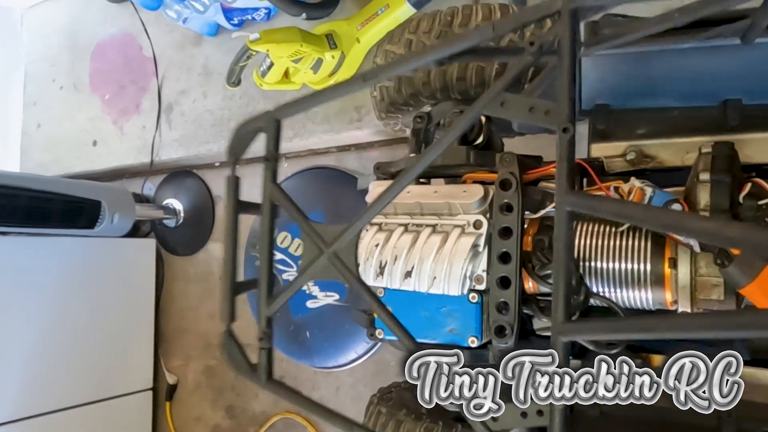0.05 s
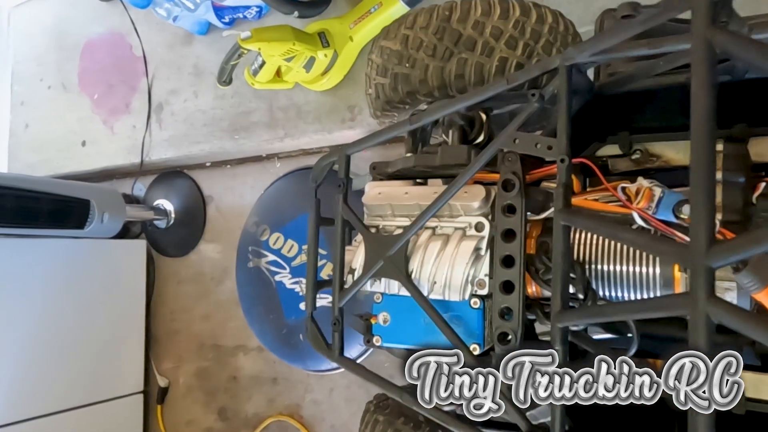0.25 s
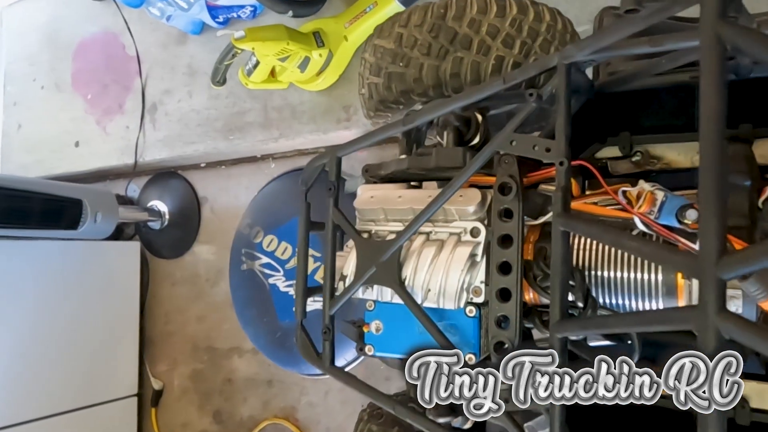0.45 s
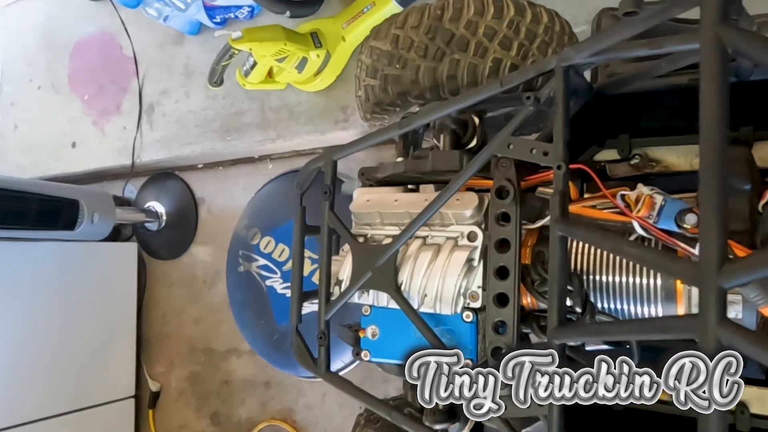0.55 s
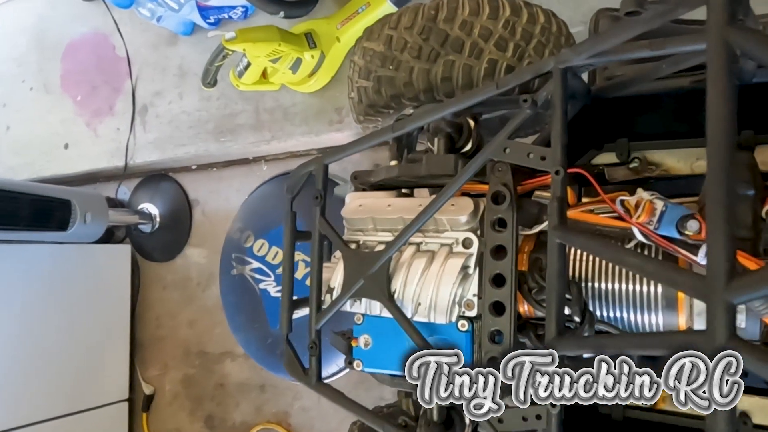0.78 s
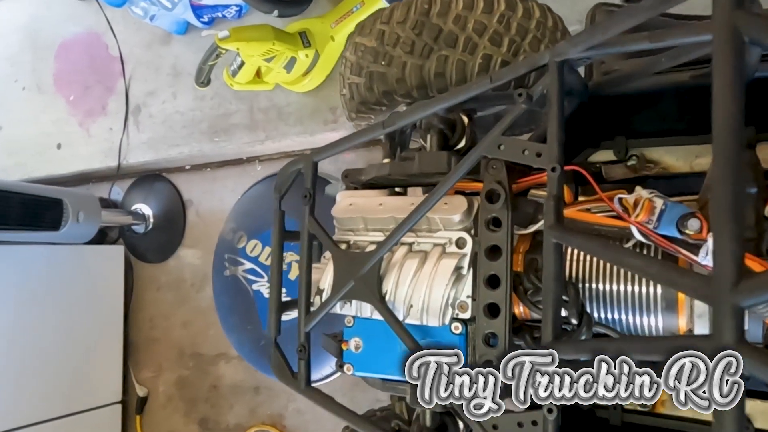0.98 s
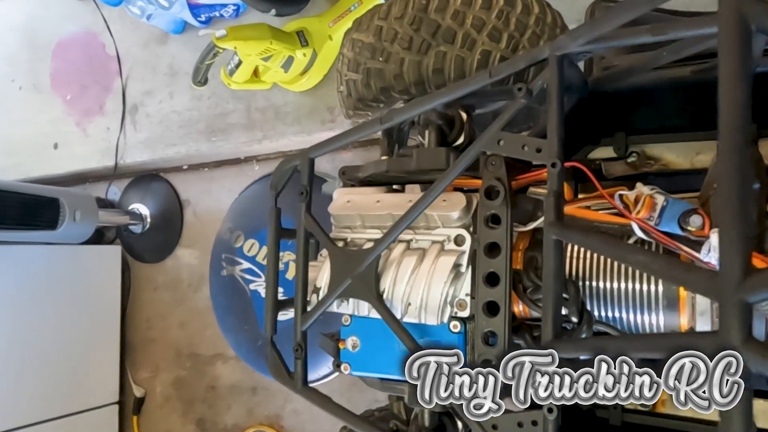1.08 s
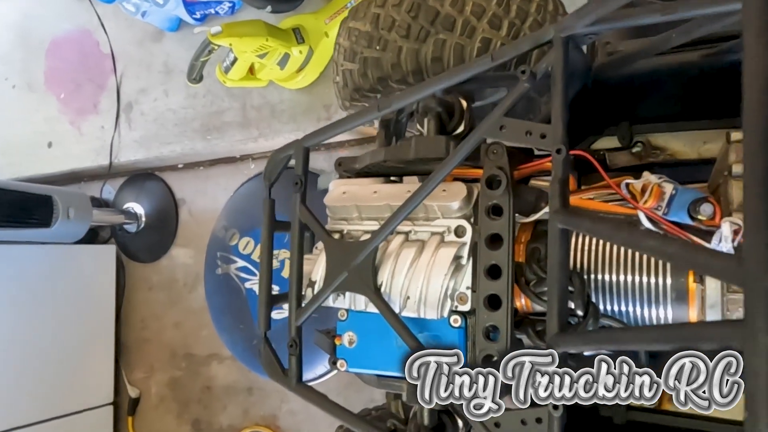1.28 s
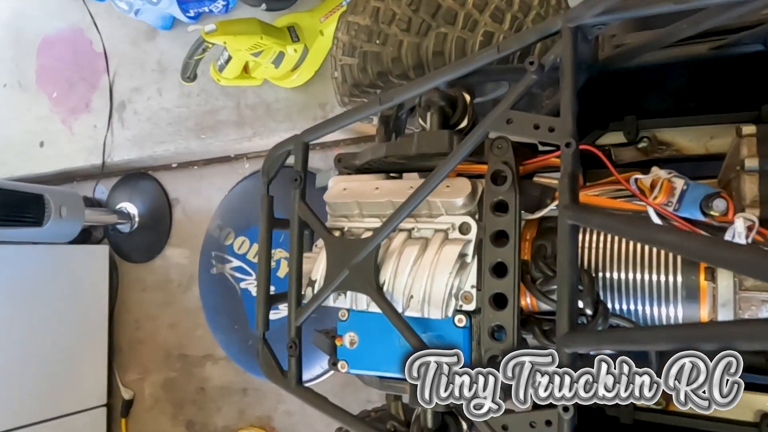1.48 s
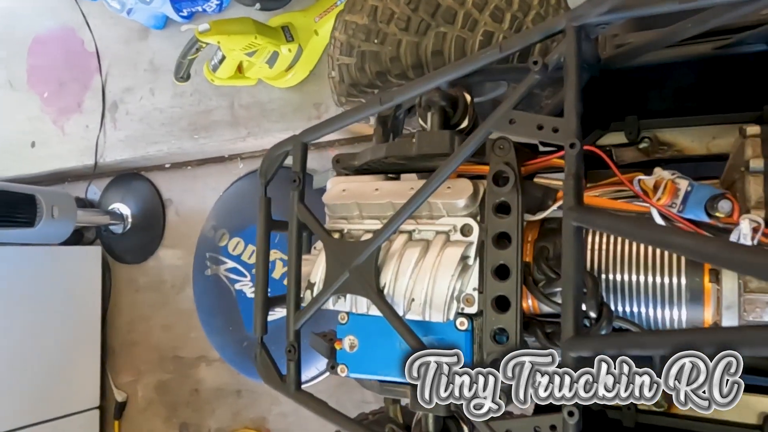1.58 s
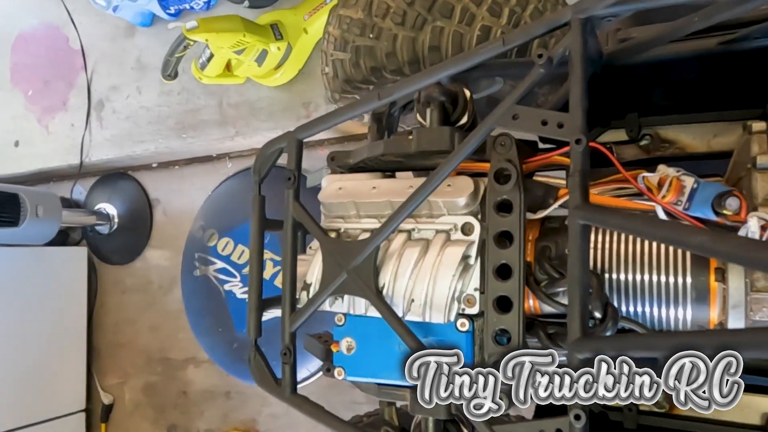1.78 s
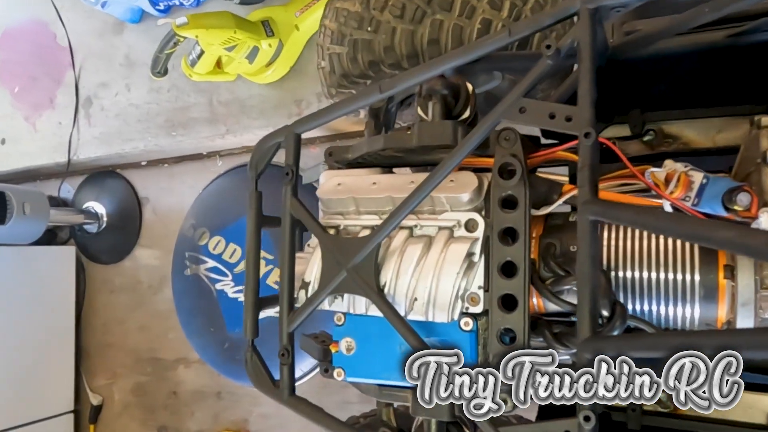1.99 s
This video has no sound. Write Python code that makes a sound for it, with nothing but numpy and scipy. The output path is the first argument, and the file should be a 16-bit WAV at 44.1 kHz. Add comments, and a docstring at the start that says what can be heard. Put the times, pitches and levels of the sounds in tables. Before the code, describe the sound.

A metal tube cage snaps shut on steel sliders, very close: a faint rustle at 0.1 s, a light touch, then a loud overloaded clack at 0.2 s with tiny rapid bounces, brief metallic ringing and a short room tail. Quiet fan hum and low rumble continue. Around 1.2 to 1.3 s come small clicks with a soft low thump, and a barely audible tick at 1.85 s. Nearly mono.

```python
"""In a quiet workshop, a tube cage snaps shut on steel sliders close to a phone microphone.
A light touch leads to a loud clipped blow with bounces: damped sines ring the tubes, shaped noise makes
the crack and the short room tail. Later come small ticks (noise clicks with sine rings) and soft low
knocks (damped bass sines). Behind it all a fan hums, from filtered noise and wavering tones, over a
wandering rumble; a faint high rustle comes before the snap. Nearly mono: a very faint lagged, filtered
copy and shaped noise set the channels slightly apart."""
import sys
import numpy as np
from scipy import signal
from scipy.fft import rfft, irfft
from scipy.io import wavfile
from scipy.ndimage import uniform_filter1d

SR = 44100
rng = np.random.default_rng(int(sys.argv[2]) if len(sys.argv) > 2 else 0)


def to_wav(sig):
    """Store sig (one row per channel, or 1-D mono) as 16-bit WAV at the path in sys.argv[1].

    Samples outside -1..1 are clipped; the rate is SR.
    """
    pcm = np.clip(np.atleast_2d(sig), -1, 1) * 32767
    pcm = np.round(pcm).astype(np.int16)
    wavfile.write(sys.argv[1], SR, pcm.T)  # frames by channels


N = 90404
T = np.arange(N) / SR  # s
F = np.maximum(np.arange(N // 2 + 1) * SR / N, 1)  # Hz, kept off zero for the logarithms

# Contacts of cage and slider: start_s, relative level_db, contact_ms, dullness_db_per_octave
CONTACTS = [(.195, -17, 0.12, 2.5), (0.203, -9.5, 0.29, 0.5), (0.2057, 2.5, 0.22, -1),
            (0.2093, -7.5, 0.24, -5.5), (0.2134, -7.5, .5, 3.5), (0.2222, -15.5, .5, 0.5),
            (.2505, -22.5, 0.46, -3)]
DULLNESS_PIVOT_HZ = 2500  # dullness tilts the spectrum about this pitch


def amp(db):
    """Amplitude ratio of a level in dB."""
    return 10 ** (np.asarray(db) / 20)


def read_log_hz(table, hz):
    """Second column of a table, interpolated on a log-frequency axis."""
    table = np.array(table)
    return np.interp(np.log(hz), np.log(table[:, 0]), table[:, 1])


def envelope_db(points):
    """Level in dB over time, joined by straight lines between the points."""
    return np.interp(T, *np.array(points).T)


def noise(gain):
    """Noise of unit rms, its spectrum shaped by a gain per frequency."""
    shaped = irfft(rfft(rng.standard_normal(N)) * gain, N)
    return shaped / np.sqrt(np.mean(shaped ** 2))


def peak(hz, width_hz):
    """Resonance-shaped gain, down to half at half the width from the centre."""
    return 1 / (1 + ((F - hz) / (width_hz / 2)) ** 2)


def walk(rate_hz):
    """Smooth random wander: held random steps, averaged twice."""
    hold = int(SR / rate_hz)
    steps = np.repeat(rng.standard_normal(N // hold + 1), hold)
    smooth = uniform_filter1d(uniform_filter1d(steps, hold), hold)
    return 1.323 * smooth[:N]  # makes up for the level lost in averaging


def fade(start_s, t60_s, rise_s):
    """Exponential rise from the start, times a decay of 60 dB in t60."""
    t60_s = max(t60_s, .002)
    out = np.zeros(N)
    span = slice(int(start_s * SR) + 1, int((start_s + 2 * t60_s) * SR))
    t = T[span] - start_s
    rise = 1 - np.exp(-t / max(rise_s, 1e-5))
    out[span] = rise * np.exp(-np.log(1000) * t / t60_s)
    return out


def ring(start_s, hz, t60_s, rise_s):
    """Damped mode: a sine that starts at zero phase and dies away."""
    return fade(start_s, t60_s, rise_s) * np.sin(2 * np.pi * hz * (T - start_s))


def tubes():
    """Each contact excites every mode of the cage; a longer contact starts them more slowly."""
    # Tube modes: pitch_hz, relative level_db, t60_s
    modes = [(935, -4, 0.044), (1293, -6, .06), (1430, -12.5, 0.19), (1768, -5, 0.093), (1906, -17, .15),
             (2142, -20, 0.14), (2731, -10.5, 0.09), (2923, 1.5, .06), (3140, -7, 0.12),
             (3520, -15.5, 0.2017), (3615, -9, 0.0599), (4150, -10.5, .05), (5162, -12.5, .1),
             (5766, -10, .04)]
    spread_db = 2.6 * rng.standard_normal((len(CONTACTS), len(modes)))
    out = np.zeros(N)
    for i, (start_s, level_db, contact_ms, dullness) in enumerate(CONTACTS):
        for k, (hz, mode_db, t60_s) in enumerate(modes):
            tilt_db = -dullness * np.log2(hz / DULLNESS_PIVOT_HZ)
            level = amp(level_db + mode_db + tilt_db + spread_db[i, k])
            sign = (-1) ** k  # neighbouring modes start in opposite directions
            out += sign * level * ring(start_s, hz, t60_s, contact_ms / 3000)
    return out


def burst(colour, decays, extra_rise_ms):
    """Half-octave noise bands started by every contact, each dying at its own rate."""
    rattle_db, rattle_hz = 1.5, 500  # loose parts make the decay uneven
    spectrum = rfft(rng.standard_normal(N)) * amp(read_log_hz(colour, F))
    norm = np.std(irfft(spectrum, N))
    out = np.zeros(N)
    for hz in 150 * 2 ** np.arange(0, 7, .5):
        octaves_off = np.clip(np.log2(F / hz), -.5, .5)
        band = irfft(spectrum * np.cos(np.pi * octaves_off) ** 2, N) / norm
        t60_s = read_log_hz(decays, hz)
        power = np.zeros(N)
        for start_s, level_db, contact_ms, dullness in CONTACTS:
            level = amp(level_db - dullness * np.log2(hz / DULLNESS_PIVOT_HZ))
            power += (level * fade(start_s, t60_s, (contact_ms + extra_rise_ms) / 1000)) ** 2
        out += band * np.sqrt(power)
    return out * amp(rattle_db * walk(rattle_hz))


def crack():
    """Broadband noise of the impact, rising within the contact time."""
    # Crack spectrum: frequency_hz, relative level_db per Hz
    crack_colour = [(150, -36.5), (300, -26.5), (500, -19), (900, -4), (1500, -5.5), (2200, -1.5),
                    (3000, -3), (4000, -7), (4700, -19), (5900, -8.5), (7300, -16.5), (8700, -12),
                    (11000, -23.5), (16000, -36.5)]
    # Crack decay: frequency_hz, t60_s
    crack_decay = [(200, 0.066), (1000, .055), (3000, 0.051), (5500, 0.064), (9000, 0.029), (15000, 0.028)]
    return burst(crack_colour, crack_decay, 0)


def room_tail():
    """The room answers each contact with noise that builds more slowly and lasts longer."""
    # Room spectrum: frequency_hz, relative level_db per Hz
    room_colour = [(150, -30), (250, -22), (400, -24), (700, -12), (1400, -4.5), (2000, -7), (3500, -6),
                   (4700, -16), (6000, -12.5), (7600, -18), (10000, -29), (13400, -44), (16000, -54.5)]
    # Room decay: frequency_hz, t60_s
    room_decay = [(200, .3), (1000, 0.27), (3000, 0.31), (7000, .3), (15000, .2)]
    return burst(room_colour, room_decay, 15)


def cage():
    """The contacts ring the tubes, crack, and fill the room."""
    tubes_db, crack_db, room_db = -9.5, -4.5, -18
    return amp(tubes_db) * tubes() + amp(crack_db) * crack() + amp(room_db) * room_tail()


def ticks():
    """Small contacts: a bright noise click, two short rings and a faint noise tail."""
    # Ticks: start_s, click_db, ring_hz, ring_db, second_ring_hz, second_ring_db, ring_t60_s
    tick_rows = [(1.2256, -31.5, 3150, -24.5, 4450, -29.5, .015), (1.298, -60, 6300, -57, 4300, -60, .01),
                 (1.3047, -43, 4100, -23.5, 3800, -25, 0.0077),
                 (1.306, -55, 2730, -38.5, 543, -33.5, 0.033), (1.3082, -53, 4300, -39, 1250, -28, .012),
                 (1.841, -57, 6000, -60, 7900, -60, .01)]
    rise_s, click_t60_s = .0006, .0085
    tail_db, tail_t60_s = -25.5, .15  # tail level is relative to the click
    hiss = noise(peak(6530, 7000) ** 2)
    out = np.zeros(N)
    for start_s, click_db, hz1, db1, hz2, db2, ring_t60_s in tick_rows:
        click = fade(start_s, click_t60_s, rise_s)
        tail = amp(tail_db) * fade(start_s, tail_t60_s, .0001)
        out += amp(click_db) * hiss * (click + tail)
        out += amp(db1) * ring(start_s, hz1, ring_t60_s, rise_s)
        out += amp(db2) * ring(start_s, hz2, ring_t60_s, rise_s)
    return out


def knocks():
    """Soft damped low sines, under the snap and again among the ticks."""
    # Knocks: start_s, level_db, pitch_hz, t60_s, sign of the first swing
    knock_rows = [(0.204, -27, 79.9, 0.089, 1), (0.219, -32, 288, 0.22, 1), (1.2156, -21, 75, .025, 1),
                  (1.2254, -26.5, 110.1, 0.054, 1), (1.228, -34.5, 344, 0.053, -1),
                  (1.2434, -28.5, 44.7, 0.16, 1), (1.264, -37.5, 109, 0.065, 1),
                  (1.308, -41.5, 155, 0.097, 1)]
    out = np.zeros(N)
    for start_s, level_db, hz, t60_s, sign in knock_rows:
        out += np.sign(sign) * amp(level_db) * ring(start_s, hz, t60_s, .002)
    return out


def fan():
    """Slowly wavering air hiss, narrow noise hums and tones that drift in pitch and level."""
    # Air hiss spectrum: frequency_hz, relative level_db per Hz
    air_colour = [(70, -8), (90, -16), (180, -17.5), (240, -11), (340, -16), (420, -9), (560, -11.5),
                  (800, -10), (960, -13), (1200, -11), (2000, -17), (3000, -19), (4200, -24.5),
                  (4900, -35.5), (6200, -32.5), (7500, -38.5), (10000, -42.5), (13000, -42.5), (16000, -44)]
    # Narrow hums: centre_hz, width_hz, level_db rms
    hums = [(475, 50, -60.5), (715, 51, -56.5), (1024, 30, -61)]
    # Fan tones: pitch_hz, level_db rms, waver_hz
    tones = [(291.5, -58.5, 1), (518.4, -57.5, 2.5)]
    low_cut = np.minimum(F / 70, 1) ** 2
    out = amp(-50.5 + .6 * walk(9.5)) * noise(amp(read_log_hz(air_colour, F)) * low_cut)
    for hz, width_hz, level_db in hums:
        out += amp(level_db) * noise(peak(hz, width_hz))
    for hz, level_db, waver_hz in tones:
        level = np.sqrt(2) * amp(level_db + 1.5 * walk(8))
        phase = 2 * np.pi * np.cumsum(hz + waver_hz * walk(9)) / SR
        out += level * np.sin(phase)
    return out


def rumble():
    """Deep noise around 30 Hz whose level wanders."""
    # Rumble level: time_s, level_db
    rumble_level = [(0, -57.5), (.5, -60), (.9, -55), (1.15, -58), (1.28, -48.5), (1.5, -51), (1.7, -56),
                    (2.05, -58)]
    low_cut = np.minimum(F / 8, 1)
    return amp(envelope_db(rumble_level)) * noise(peak(30, 60.27) * low_cut)


def rustle():
    """Faint high noise with a flickering level, strongest before the snap."""
    # Rustle level: time_s, level_db
    rustle_level = [(.07, -90), (.09, -66), (.13, -76), (.15, -96)]
    flicker_db = 2.53 * walk(120)
    return amp(envelope_db(rustle_level) + flicker_db) * noise(peak(6800, 2500))


def channel_offset(mid):
    """A very faint lagged, filtered copy of the middle and shaped noise set the channels slightly apart."""
    # Level of the lagged copy: frequency_hz, gain_db
    copy_gain = [(40, -39), (150, -24), (300, -28), (700, -39), (3000, -42), (6000, -37), (14000, -28)]
    # Shaped noise spectrum: frequency_hz, relative level_db per Hz
    noise_colour = [(35, -23), (60, -1), (244, -7), (301, -30.5), (4020, -22.5), (5990, -2.5), (16000, -7)]
    lag_s = .7 / 1000
    lag = np.exp(-2j * np.pi * F * lag_s)
    late = irfft(rfft(mid) * amp(read_log_hz(copy_gain, F)) * lag, N)
    return late + amp(-80) * noise(amp(read_log_hz(noise_colour, F)))


def scene():
    """Sum all sources in the middle, then add and subtract the offset for two nearly equal channels."""
    mid = cage() + ticks() + knocks() + fan() + rumble() + rustle()
    offset = channel_offset(mid)
    return np.array([mid + offset, mid - offset])


def record(dry):
    """The loud blow is clipped hard at full scale; a steep low-pass then cuts the top."""
    drive_db, top_hz = .5, 16100
    clipped = np.clip(amp(drive_db) * dry, -1, 1)
    low_pass = signal.ellip(10, .2, 75, top_hz, fs=SR, output="sos")
    return signal.sosfilt(low_pass, clipped)


dry = scene()
out = record(dry)
to_wav(out)
```